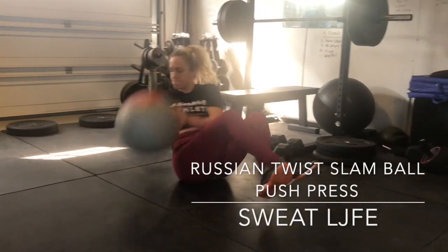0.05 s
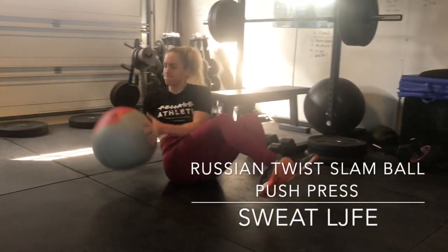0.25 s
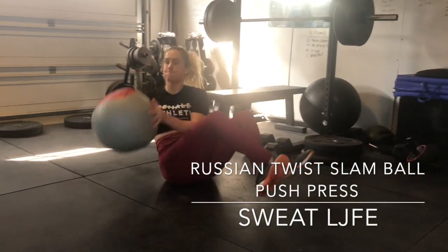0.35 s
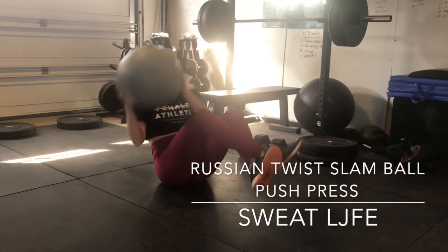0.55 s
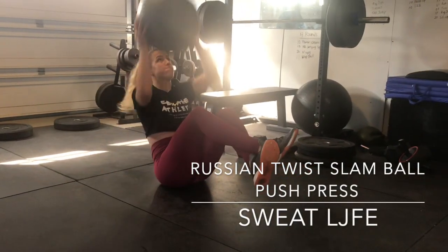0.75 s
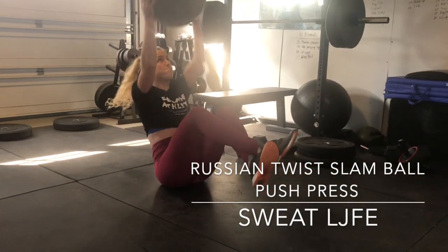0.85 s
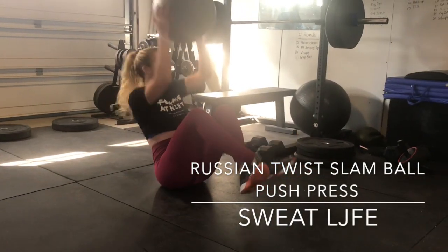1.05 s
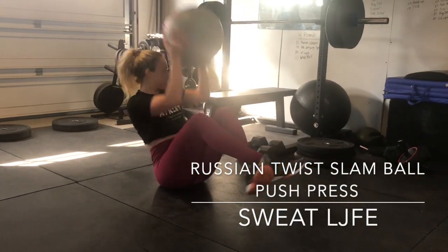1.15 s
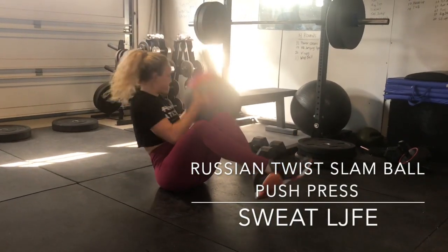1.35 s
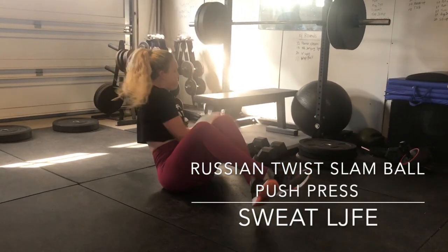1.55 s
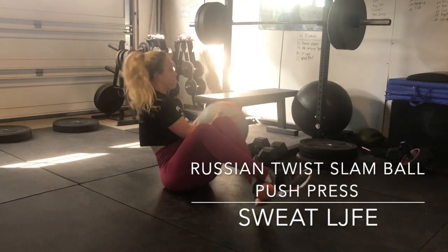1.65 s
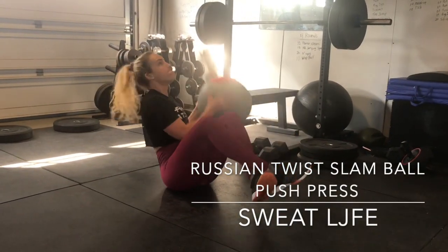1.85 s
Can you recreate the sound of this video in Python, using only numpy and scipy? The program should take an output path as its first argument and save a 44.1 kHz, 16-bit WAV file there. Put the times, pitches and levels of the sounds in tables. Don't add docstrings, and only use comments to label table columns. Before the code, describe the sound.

A heavy sand-filled ball slams twice on a hard floor, booming through a bare garage

```python
import sys
import numpy as np
from scipy import signal
from scipy.fft import rfft, irfft, next_fast_len
from scipy.io import wavfile
from scipy.ndimage import map_coordinates

SR = 44100
rng = np.random.default_rng(int(sys.argv[2]) if len(sys.argv) > 2 else 0)


def amplitude_ratio(level_db):
    exponent = np.asarray(level_db, float) / 20
    return 10 ** exponent


def to_wav(sig):
    pcm = np.clip(np.atleast_2d(sig), -1, 1) * 32767
    pcm = np.round(pcm).astype(np.int16)
    wavfile.write(sys.argv[1], SR, pcm.T)


N = 83790


def unit(x):
    return x / np.sqrt(np.mean(x ** 2) + 1e-20)


def along(points, hz):
    f, v = np.transpose(points)
    return np.interp(np.log(hz + 1), np.log(f + 1), v)


def filtered(x, response):
    m = next_fast_len(N + SR // 2)
    return irfft(rfft(x, m) * response(np.fft.rfftfreq(m, 1 / SR)), m)[:N]


def peak(f, hz, width):
    return 1j * f * width / (hz * hz - f * f + 1j * f * width)


def resonances(f, rows, power=2):
    return sum(amplitude_ratio(db) * peak(f, hz, width) ** power for hz, width, db in rows)


def noise(response):
    return unit(filtered(rng.standard_normal(N), response))


def since(s):
    return np.clip(np.arange(N) / SR - s, 0, None)


def swell(s, rise):
    return 1 - np.exp(-since(s) / rise)


def fade(s, db, t60):
    return amplitude_ratio(db - 60 * since(s) / t60)


def wander(per_second):
    return map_coordinates(rng.standard_normal(256), [np.arange(N) * per_second / SR])


# (frequency [Hz], width [Hz], level [dB])
SKIN = [
    [(1700, 1300, 1.5), (2845, 2400, -1), (4800, 9000, -6), (8370, 2900, -10), (12870, 4000, -13.5)],
    [(1750, 3500, 10.5), (3430, 4740, 10.5), (6600, 4000, -19), (9700, 15000, -4), (14130, 6600, -12)],
]
# (delay [s], level [dB])
WALLS = [
    [(.0011, -7), (.002, -6), (.0033, -3.5), (.0095, -3), (.0165, -25), (.036, -11)],
    [(.0037, -6), (.0055, -17), (.0095, -19), (.015, -6.5), (.017, -17)],
]
# (level [dB], t60 [s])
SPRAY = [(-23, 0.023), (-23, .03)]


def crack(s, db, k):
    def colour(f):
        return resonances(f, SKIN[k]) / (1 + 1j * f / 14000)

    def snap(f):
        return -np.exp(-2j * np.pi * f * s) * colour(f)

    def copies(f):
        echoes = sum((-1) ** i * amplitude_ratio(g) * np.exp(-2j * np.pi * f * delay)
                     for i, (delay, g) in enumerate(WALLS[k]))
        return 1 + echoes / (1 + 1j * f / 9000) ** 2

    pulse = (np.arange(N) == 0).astype(float)
    loudest = np.abs(filtered(pulse, snap)).max()
    snaps = filtered(pulse, lambda f: snap(f) * copies(f)) / loudest
    air_db, air_t60 = SPRAY[k]
    air = fade(s, air_db, air_t60) * (since(s) > 0) * noise(colour)
    return amplitude_ratio(db) * snaps + air


# (frequency [Hz], level [dB], t60 [s])
THUD = [
    [(124.9, -3, 0.18), (187.2, -4, 0.26), (227.9, -9.5, 0.68), (249, 3, 0.41), (283, -2.5, 0.13),
     (350.2, 1, 0.14), (426, -4, 0.13), (581, -6, .1), (685, -10.5, 0.23), (703, -6.5, 0.16), (897, -9, .3),
     (1096, -5, 0.12)],
    [(90, 2, 0.098), (164.4, -8.5, 0.43), (188.8, -0.5, 0.277), (262.6, -9, 0.21), (344.3, -2, .2),
     (405, -3, 0.13), (610, -4.5, 0.19), (660, -15, 0.48), (705, -10.5, 0.35), (1060, -12, 0.19)],
]
# (delay [s], rise [s])
SQUASH = [(.003, 0.0023), (.008, 0.0061)]


def thud(s, db, k):
    delay, rise = SQUASH[k]
    t = since(s + delay)
    ring = np.zeros(N)
    for hz, mode_db, t60 in THUD[k]:
        level = amplitude_ratio(mode_db - 60 * t / t60 + 0.7 * wander(25))
        phase = 0.2 * wander(25) + hz / 100
        ring += level * np.sin(2 * np.pi * hz * t + phase)
    return amplitude_ratio(db) * (1 - np.exp(-(t / rise) ** 2)) * ring / 2


def fading_tones(rows, rise):
    out = np.zeros(N)
    for s, db, hz, t60 in rows:
        out += fade(s, db, t60) * swell(s, rise) * np.sin(2 * np.pi * hz * since(s))
    return out


# (time [s], level [dB], frequency [Hz], t60 [s])
PUSHES = [
    (.2245, -20, 420, .012),
    (.2295, -14, 290, .035),
    (.2295, -19, 700, .02),
    (1.5915, -21, 200, .04),
    (1.6012, -20, 195, .05),
]


def pushes():
    return fading_tones(PUSHES, 1 / SR)


# (time [s], level [dB], frequency [Hz], t60 [s])
BOOM = [
    (.24, -27, 63, .6),
    (.24, -29, 50, .6),
    (.224, -20, 70, .12),
    (.226, -21, 100, .13),
    (1.583, -31, 63, .8),
    (1.581, -26, 78, .16),
]


def boom():
    return amplitude_ratio(-1.06) * fading_tones(BOOM, 0.0039)


# (frequency [Hz], level [dB per Hz])
TAIL = [
    [(25, -40.5), (60, -21.5), (140, -16.5), (245, -7.5), (520, -18.5), (900, -19), (2340, -26),
     (16000, -44.5)],
    [(25, -14), (70, -11), (135, -9), (250, -7.5), (520, -9.5), (700, -12.5), (4560, -21), (16000, -38.5)],
]
# (frequency [Hz], t60 [s])
ROOM = [(60, 0.93), (250, 0.7), (1000, 0.63), (3000, 0.53), (7500, 0.42), (12000, 0.35)]


def tail(s, db, k):
    hz, t, z = signal.stft(noise(lambda f: amplitude_ratio(along(TAIL[k], f))), SR, nperseg=512)
    decay = amplitude_ratio(-60 * np.clip(t - s, 0, None) / along(ROOM, hz)[:, None])
    x = signal.istft(z * decay, SR, nperseg=512)[1][:N]
    return amplitude_ratio(db) * swell(s, 0.007) * x


# (time [s], crack level [dB], thud level [dB], room level [dB])
SLAMS = [
    (.2210, -8.5, -16.5, -24.5),
    (1.5798, -8.5, -18.5, -27.5),
]


def slams():
    out = pushes() + boom()
    for k, (s, crack_db, thud_db, room_db) in enumerate(SLAMS):
        out += crack(s, crack_db, k) + thud(s, thud_db, k) + tail(s, room_db, k)
    return out


def lumps():
    return amplitude_ratio(2 * wander(90))


# (time [s], rise [s], t60 [s], level [dB], brightness [dB per octave])
SHIFTS = [
    (0.123, 0.018, 1.1, -57, -1.5),
    (0.944, 0.03, 0.49, -54, -3),
    (1.091, 0.0085, 0.31, -60, -12),
    (1.209, 0.021, 0.36, -56.5, -1.9),
    (1.471, 0.1, 1.3, -52, -3.5),
]
# (frequency [Hz], level [dB per Hz])
SAND = [(60, -25), (150, -4), (280, -1), (450, -10), (800, -5), (1600, -16.5), (4000, -21), (15000, -41)]


def shifting():
    out = np.zeros(N)
    for s, rise, t60, db, tilt_db in SHIFTS:
        colour = lambda f: amplitude_ratio(along(SAND, f) + tilt_db * np.log2((f + 20) / 500))
        out += fade(s, db, t60) * swell(s, rise) * unit(lumps() * noise(colour))
    return out


# (time [s], level [dB], t60 [s], list of (frequency [Hz], width [Hz]))
TICK = (.1315, -58, .035, [(2300, 250), (3050, 250)])


def tick():
    s, db, t60, tones = TICK
    return fade(s, db, t60) * swell(s, 0.0027) * noise(lambda f: sum(peak(f, hz, width) for hz, width in tones))


# (time [s], rise [s], level [dB], list of (frequency [Hz], width [Hz], level [dB]))
SCUFF = (1.541, 0.0059, -48, [(360, 170, 6), (1020, 360, 3), (2680, 2200, -13), (5800, 5000, -28.5)])


def scuff():
    s, rise, db, skin = SCUFF
    touching = swell(s, rise) * fade(SLAMS[1][0], 0, 0.17)
    return amplitude_ratio(db) * touching * unit(lumps() ** .5 * noise(lambda f: resonances(f, skin)))


# (peak time [s], spread [s], level [dB], frequency [Hz], width [Hz])
SWISH = (1.475, .048, -70, 2600, 3200)


def swish():
    s, spread, db, hz, width = SWISH
    sweep = np.exp(-((np.arange(N) / SR - s) / spread) ** 2 / 2)
    return amplitude_ratio(db) * sweep * noise(lambda f: peak(f, hz, width) ** 2)


# (frequency [Hz], level [dB per Hz])
ROOM_TONE = [(15, -75), (25, -25.5), (41, -8.5), (64, 1), (130, -12.5), (754, -26), (2410, -33),
             (12500, -43), (16000, -44.5)]


def room_tone():
    return amplitude_ratio(-64) * noise(lambda f: amplitude_ratio(along(ROOM_TONE, f)))


def hum():
    hz, width = 59, 5.6
    tone = amplitude_ratio(-64) * np.sin(2 * np.pi * hz * since(0))
    return amplitude_ratio(-79) * noise(lambda f: peak(f, hz, width) ** 2) + tone


def whine():
    return amplitude_ratio(-94) * noise(lambda f: peak(f, 13550, 300) ** 2)


# (time [s], level [dB])
HISS = [(0, -85), (.125, -79), (.135, -75), (.5, -71.5), (.55, -70), (.632, -70), (.642, -77.5), (.94, -98),
        (.948, -77.5), (1.02, -81), (1.4, -87), (1.57, -73), (1.9, -69.5)]
# (frequency [Hz], level [dB per Hz])
HISS_COLOUR = [(1500, -8), (4000, 0.5), (7000, -4), (12000, -7), (16000, -11)]


def hiss():
    s, db = np.transpose(HISS)
    level = amplitude_ratio(np.interp(np.arange(N) / SR, s, db))
    return level * noise(lambda f: amplitude_ratio(along(HISS_COLOUR, f)))


def scene():
    movements = shifting() + tick() + scuff() + swish()
    background = room_tone() + hum() + whine() + hiss()
    return (slams() + movements + background)[None]


def band_limit(x):
    return signal.sosfilt(signal.butter(12, 17030, fs=SR, output="sos"), x)


def record(dry):
    low_hz, top_hz, edge_hz, end_hz = 39, 15850, 60, 16900

    def mic(f):
        bass_cut = (1j * f / low_hz / (1 + 1j * f / low_hz)) ** 2
        above = 1 / (1 + np.exp(np.clip((top_hz - f) / edge_hz, -50, 50)))
        return bass_cut * amplitude_ratio(-36 * above) * (f < end_hz)

    return band_limit(filtered(dry[0], mic)[None])


dry = scene()
out = record(dry)
to_wav(out)
```